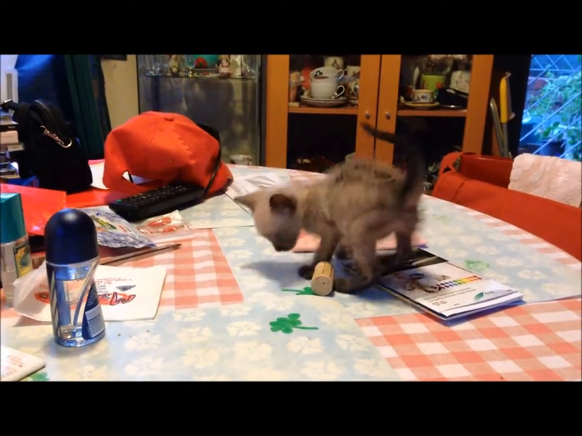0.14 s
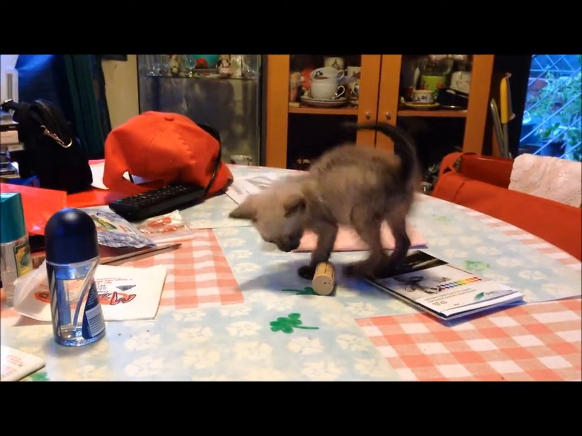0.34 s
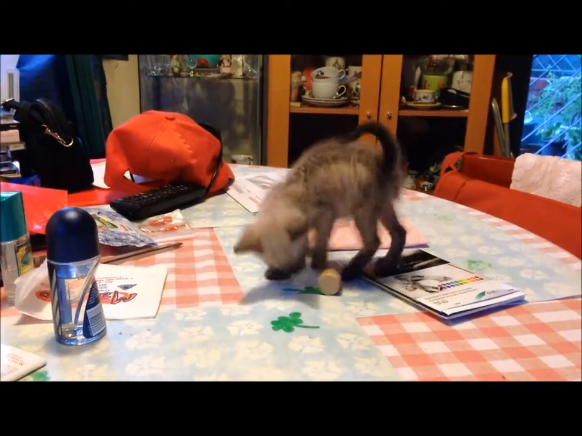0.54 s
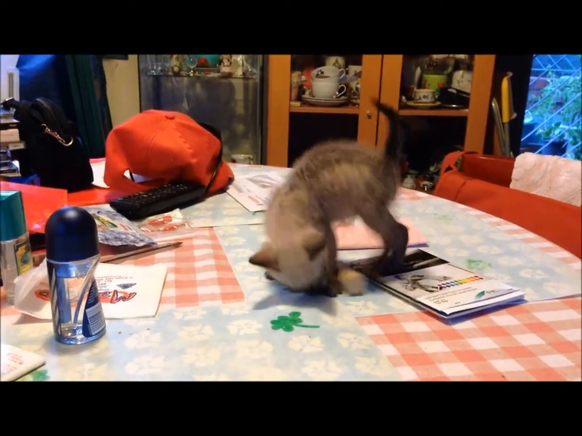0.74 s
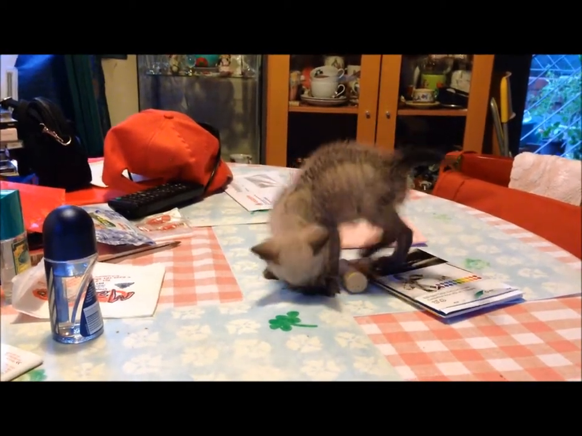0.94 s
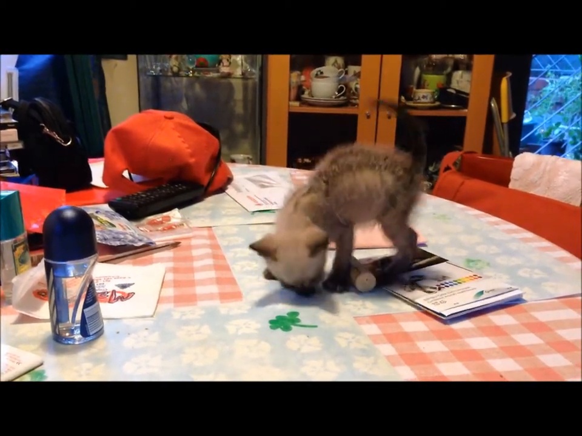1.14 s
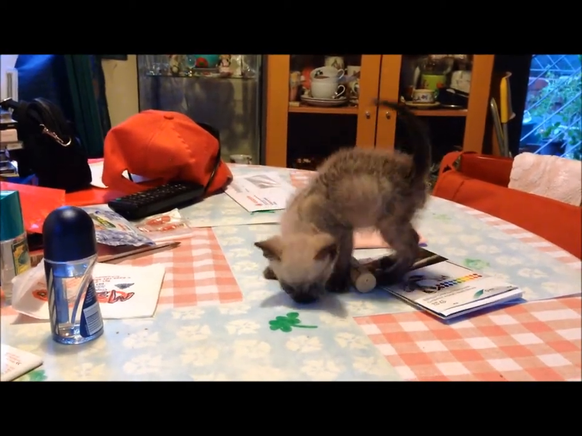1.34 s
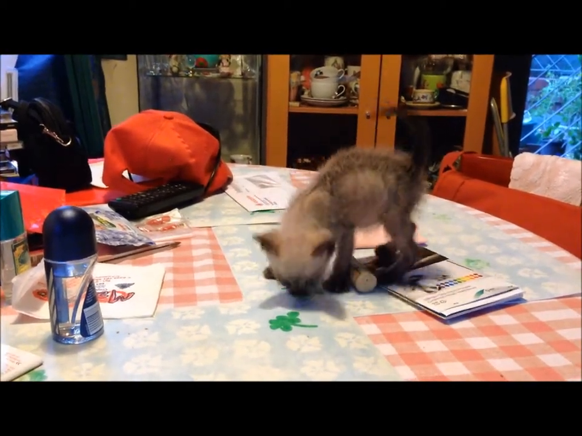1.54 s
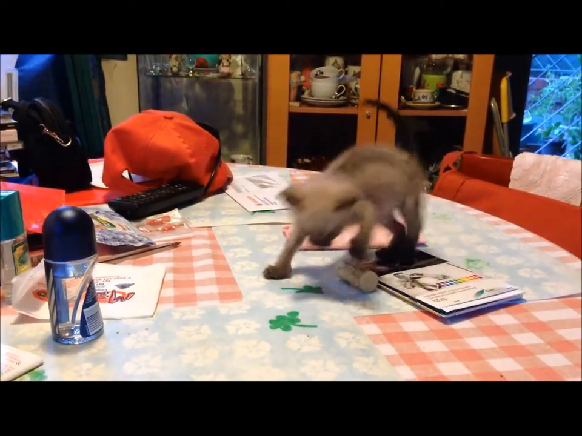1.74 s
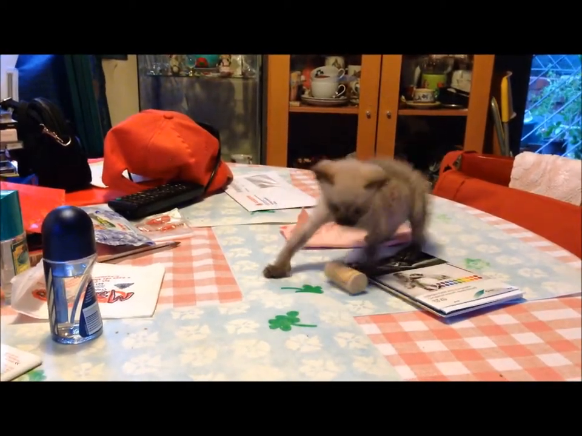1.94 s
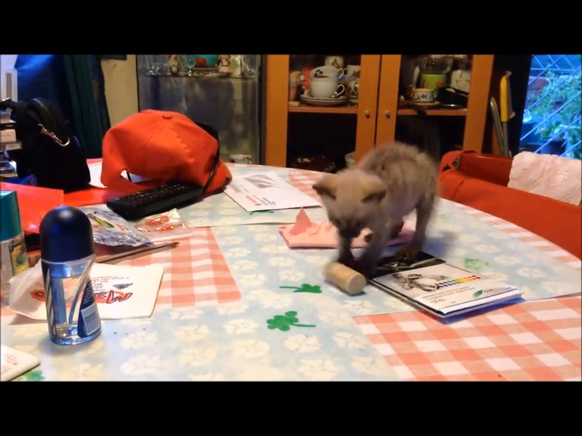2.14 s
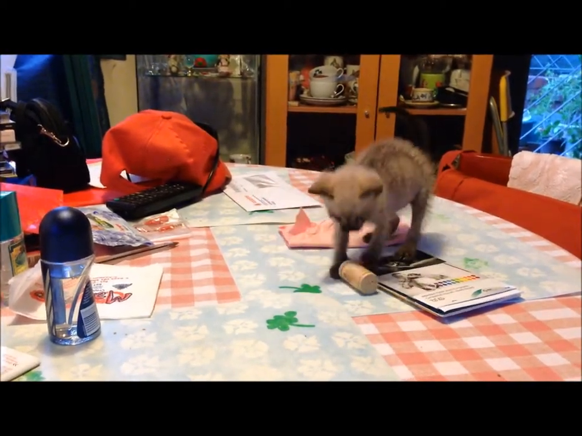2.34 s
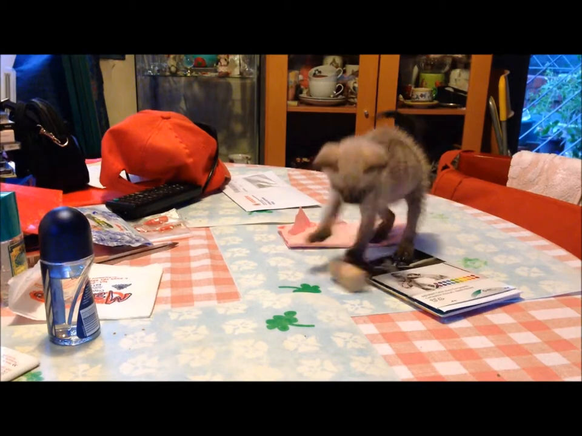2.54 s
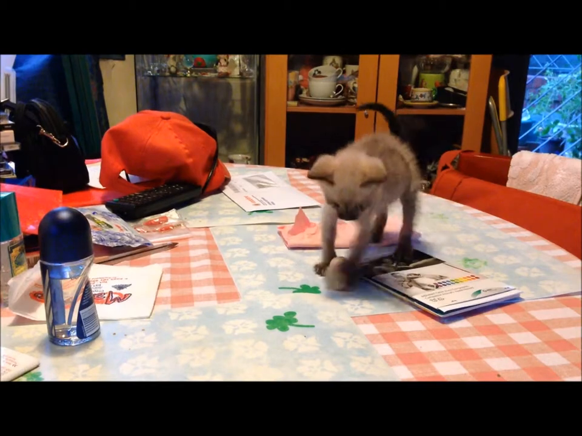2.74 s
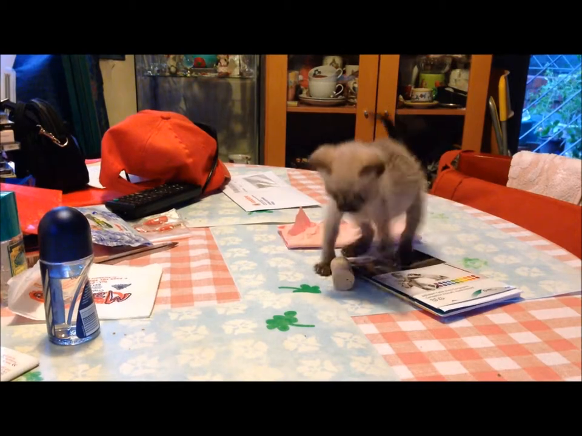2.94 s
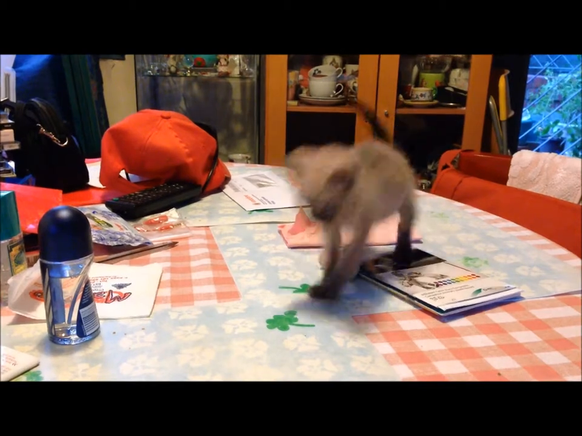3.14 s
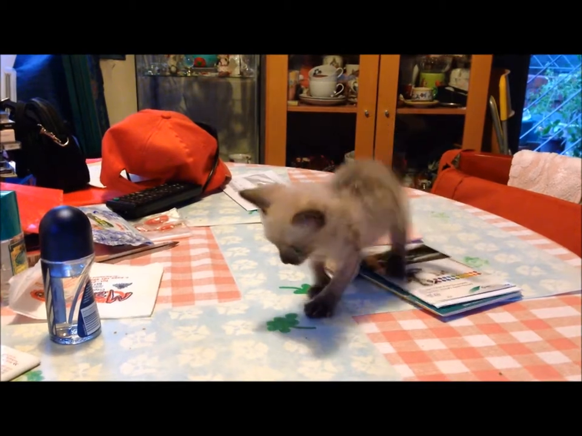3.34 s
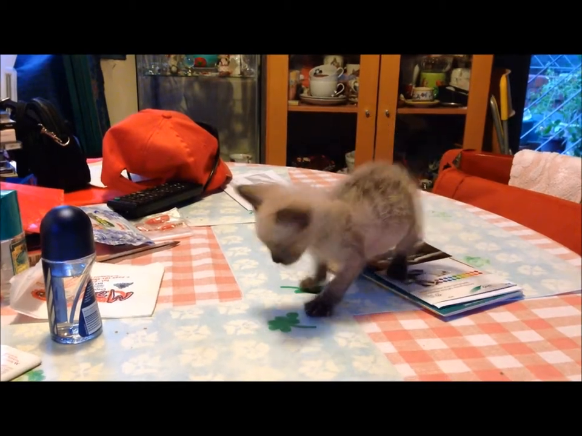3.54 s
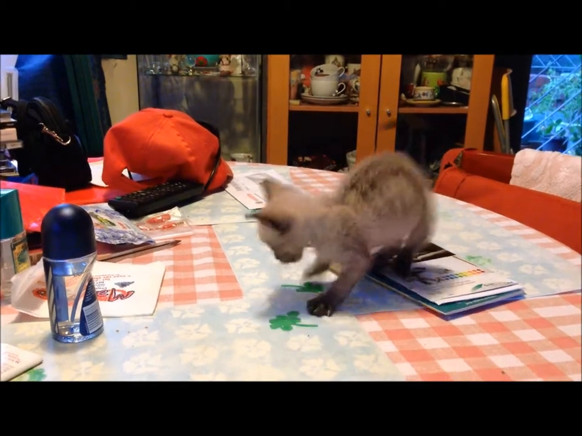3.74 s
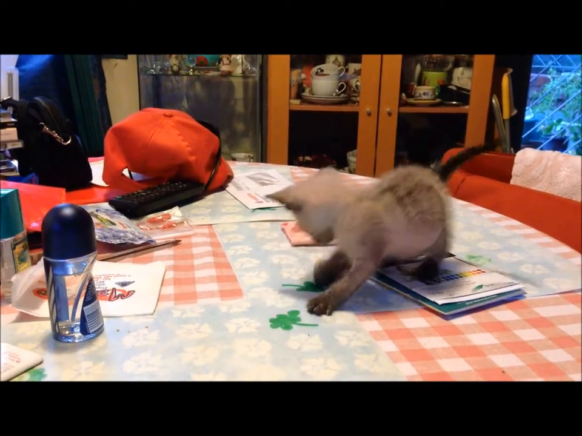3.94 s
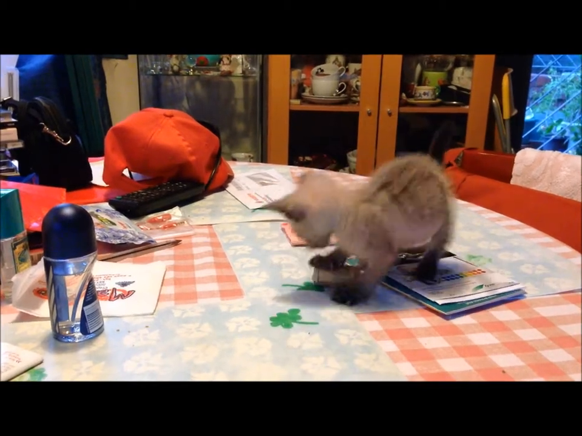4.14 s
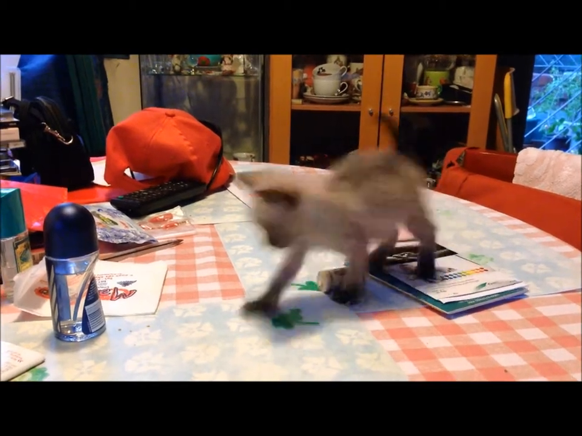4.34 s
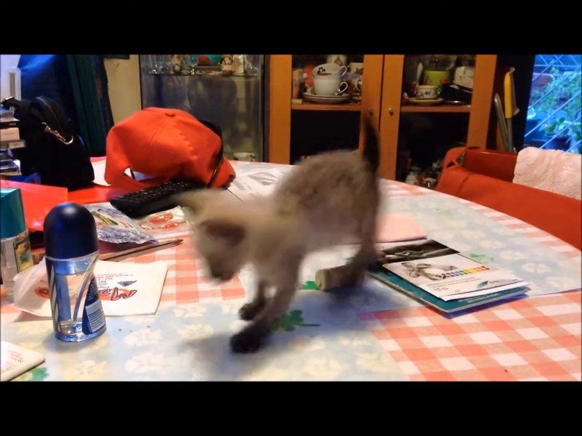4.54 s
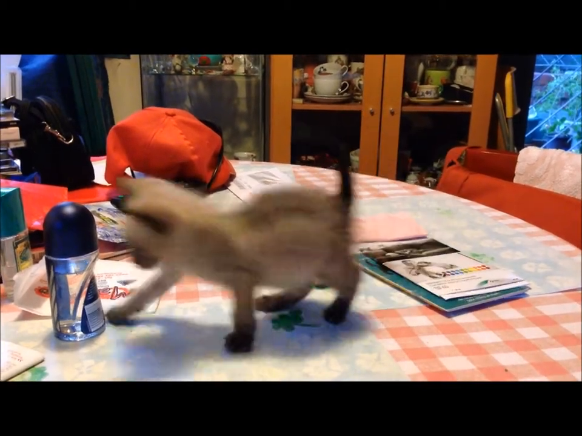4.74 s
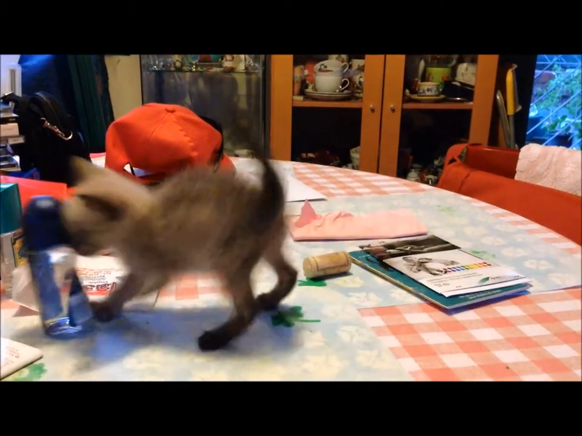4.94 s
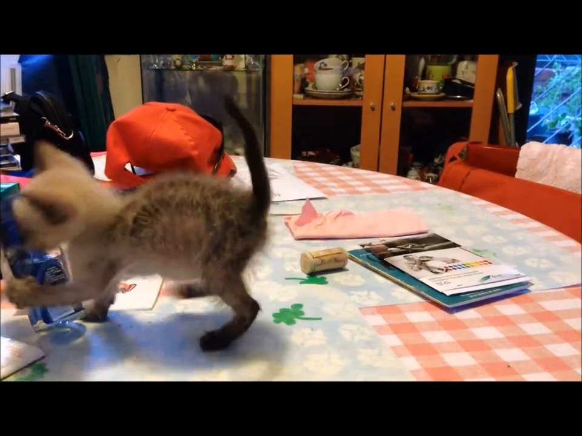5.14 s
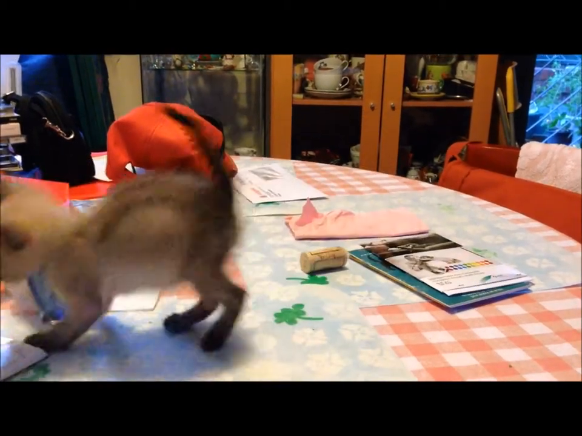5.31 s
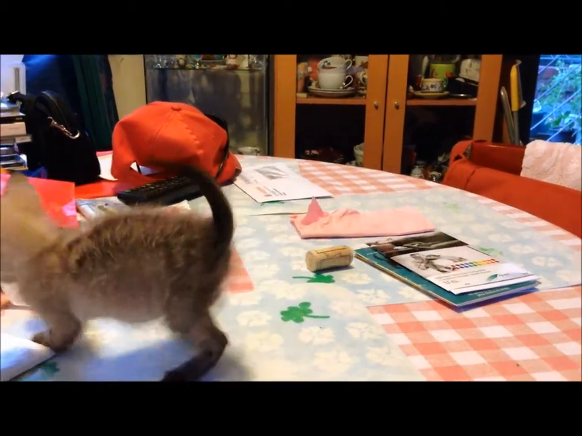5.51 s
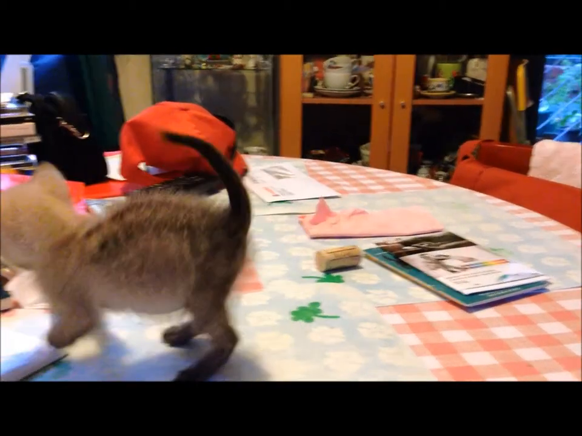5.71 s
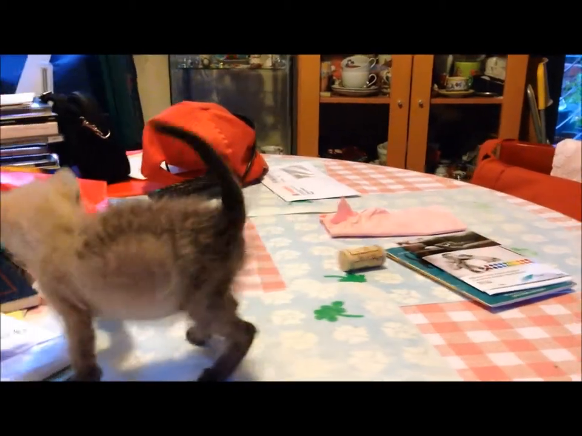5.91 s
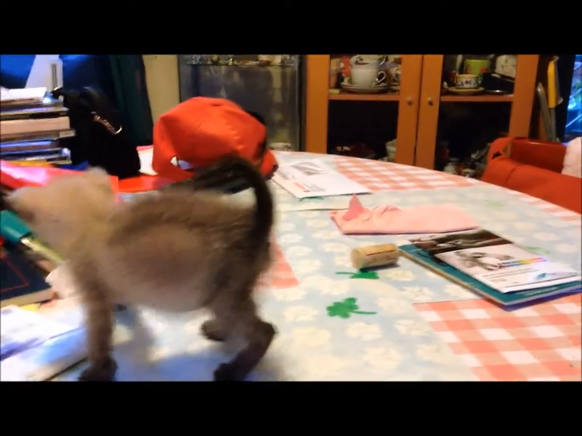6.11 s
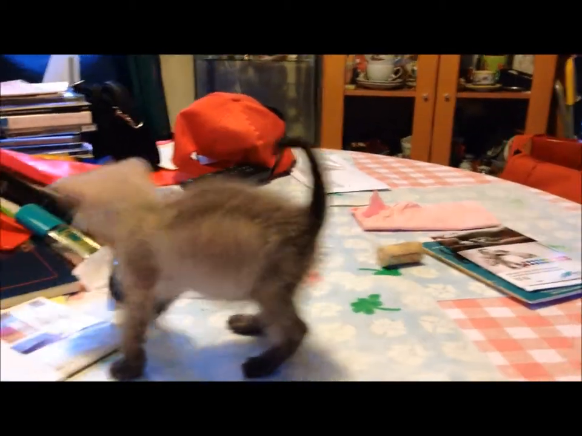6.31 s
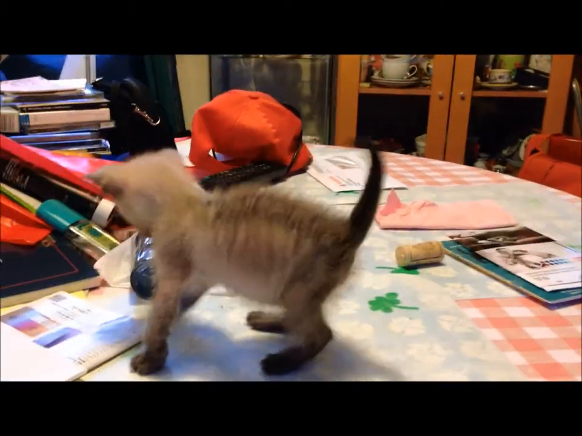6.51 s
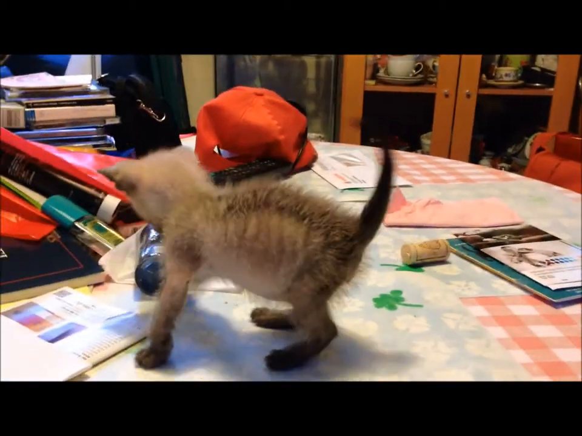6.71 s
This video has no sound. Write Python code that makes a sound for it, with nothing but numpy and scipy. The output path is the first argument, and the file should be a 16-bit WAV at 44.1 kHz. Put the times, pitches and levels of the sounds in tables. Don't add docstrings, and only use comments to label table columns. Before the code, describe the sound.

A small furnished room with short, grainy echoes, faint steady microphone hiss and far low rumble. A kitten plays with a cork on a cloth-covered table. A dry, light tap comes at 0.2 seconds, a faint one at 0.75, then a tight cluster at 1.1 to 1.16 with a soft paw landing. Quiet rocking nudges follow. Clearer taps fall at 2.0, 2.3 and 2.55, a claw click and scuff at 3.06, and a brisk flurry from 3.8 to 4.0 with brushing paws. Muffled little landings and ticks run from 4.4 to 4.95. Around 5.34 comes a tap, at 5.41 a sharp click as a small bottle tips, and at 5.47 its loud, low thump, by far the loudest event, with a weaker bounce at 5.53 and a brief shell rattle. Faint ticks follow at 5.75 to 5.8, a slight airy room swell near 6.1, and light taps with scuffs at 6.4 and 6.57.

```python
import sys
import numpy as np
from scipy import signal
from scipy.fft import rfft, irfft, next_fast_len
from scipy.io import wavfile
from scipy.ndimage import uniform_filter1d

SR = 44100
rng = np.random.default_rng(int(sys.argv[2]) if len(sys.argv) > 2 else 0)


def dump_mix(stems):
    frames = np.atleast_2d(stems).T
    limited = np.clip(frames, -1, 1)
    pcm = np.round(limited * 32767).astype(np.int16)
    wavfile.write(sys.argv[1], SR, pcm)


def amplitude_ratio(level_db):
    exponent = np.asarray(level_db, float) / 20
    return 10 ** exponent


N = 298557


def unit(x):
    return x / np.sqrt(np.mean(x ** 2) + 1e-20)


def along(points, hz):
    f, v = np.transpose(points)
    return np.interp(np.log(hz + 1), np.log(f + 1), v)


def filtered(x, response):
    m = next_fast_len(len(x) + 8192)
    return irfft(rfft(x, m) * response(np.fft.rfftfreq(m, 1 / SR)), m)[:len(x)]


def resonance(centre_hz, width_hz):
    return lambda f: 1j * f * width_hz / (centre_hz ** 2 - f * f + 1j * f * width_hz)


def add(track, s, x):
    part = track[round(s * SR):][:len(x)]
    part += x[:len(part)]


def dying(decay, colour):
    hz, t, z = signal.stft(rng.standard_normal(SR // 2), SR, nperseg=256)
    z = z * amplitude_ratio(along(colour, hz)[:, None] - 60 * t / along(decay, hz)[:, None])
    tail = signal.istft(z, SR, nperseg=256)[1]
    return tail / np.linalg.norm(tail)


def taps():
    # frequency in Hz, t60 in seconds.
    room_decay = [(300, 0.15), (2000, 0.21), (5000, 0.18), (12000, 0.88)]
    # frequency in Hz, level in dB.
    room_colour = [(300, 2.5), (1200, -0.5), (2200, -2.5), (5000, 0), (14000, -18)]
    rise_s = .00036
    dip_hz, dip_width_hz, dip_depth = 2790, 530, 0.62
    out = np.zeros(N)
    t = np.arange(SR // 50) / SR
    for s, db, hz, click_db, crack_db, wet_db in contacts():
        swell = (t / rise_s) ** 1.5 * np.exp(-t / rise_s)
        main = np.sin(2 * np.pi * hz * t)
        partner = .6 * np.sin(2 * np.pi * 1.33 * hz * t + rng.uniform(0, np.pi))
        below = 0.394 * min(amplitude_ratio(click_db), 1) * np.sin(2 * np.pi * 0.754 * hz * t)
        body = swell * (main + partner + below)
        click = amplitude_ratio(click_db) * snap(t, centre_hz=4110, width_hz=2180, life=0.000502)
        crack = amplitude_ratio(crack_db) * snap(t, centre_hz=7550, width_hz=3200, life=.0005)
        tap = amplitude_ratio(db + 5.0) * (body / np.abs(body).max() + click + crack)
        add(out, s - .0004, tap)

        touch = rng.standard_normal(len(t)) * np.exp(-((t - .004) / 0.0045) ** 2)
        brush = filtered(touch, lambda f: resonance(2600, 1200)(f) ** 2)
        add(out, s - .005, amplitude_ratio(db - 5.0) * brush)

        sideways = amplitude_ratio(db - 0.5) * snap(t, centre_hz=2270, width_hz=1600, life=0.00014)
        spread = 0.47 * tap + sideways
        tail = dying(room_decay, room_colour)
        lumps = unit(uniform_filter1d(rng.standard_normal(len(tail)), size=90))
        tail = tail * amplitude_ratio(3.7 * lumps)
        echo = signal.fftconvolve(spread, tail / np.linalg.norm(tail))
        add(out, s + .003, amplitude_ratio(wet_db - 0.5) * echo)

    def radiation(f):
        low_cut = (1j * f / (520 + 1j * f)) ** 3
        return low_cut * (1 - dip_depth * resonance(dip_hz, dip_width_hz)(f))

    return filtered(out, radiation)


def contacts():
    # start in seconds, peak in dB, ring in Hz, hardness in dB.
    knocks = [(0.2048, -27.5, 1830, -32), (0.7491, -43.5, 1850, -4), (1.0915, -40, 1700, -8),
              (1.0989, -36.5, 1240, -11), (1.1589, -27, 1690, -26), (1.7601, -45.5, 1270, -4.5),
              (2.0147, -28.5, 2019, -5), (2.3305, -38.5, 1928, -2.5), (2.5536, -35, 2030, -1.5),
              (2.663, -46.5, 1600, -10), (3.7921, -33, 1270, -13), (3.8154, -38.5, 2100, -13),
              (3.888, -44, 1360, -12), (3.9848, -32.5, 2290, -0.5), (3.9938, -28, 2040, 0.5),
              (4.44, -50, 1560, -9), (4.744, -51, 1250, -3.5), (5.3376, -30, 1610, -9.5),
              (6.378, -34.5, 1950, -5), (6.5692, -35.5, 1546, -7), (6.5726, -41, 1700, -8)]
    # start in seconds, peak in dB, ring in Hz, hardness in dB.
    muffled = [
        (3.0935, -41.5, 1760, -14),
        (4.585, -42, 1860, -9.5),
        (4.6214, -44, 2120, 0),
        (4.794, -35.5, 2300, 3),
    ]
    # start in seconds, peak in dB, ring in Hz, hardness in dB.
    claws = [(0.1775, -57, 2010, 0), (0.4954, -55, 1790, -4), (0.778, -51.5, 1910, -1),
             (0.9924, -66.5, 2780, 6), (1.1371, -30, 2120, -12.5), (1.9182, -55, 1490, -2.5),
             (2.7277, -51.5, 1600, -1.5), (3.0617, -33.5, 1900, -12), (3.5972, -57, 2480, -22),
             (4.139, -59, 1860, 1.5), (4.4113, -45, 2070, -3), (4.9392, -50.5, 2300, -4),
             (4.9876, -50.5, 2700, -4), (5.4124, -21.5, 1690, -2), (5.7454, -52.5, 2600, 0),
             (5.8174, -46.5, 2000, -11), (6.3804, -39.5, 2390, -11.5), (6.566, -37.5, 2140, -8)]
    # start in seconds, peak in dB, ring in Hz, hardness in dB.
    rattles = [
        (5.429, -50, 1930, 1.5),
        (5.4689, -30.5, 2000, -10),
        (5.4924, -37.5, 2160, -1),
        (5.5318, -35, 1740, 7),
        (5.543, -30.5, 2310, -17),
        (5.5494, -42.5, 3370, -2),
    ]
    # start in seconds, peak in dB, ring in Hz.
    nudges = [(0.066, -58, 2070), (1.03, -57, 1857), (1.038, -59, 1600), (1.353, -60, 1940),
              (1.431, -56, 1790), (1.49, -53, 1990), (1.6583, -59, 2140), (2.1654, -65, 2450),
              (2.7, -55, 2360), (2.743, -55.5, 1410), (2.88, -51, 1590), (2.9733, -58.5, 1530),
              (3.2025, -49.5, 1620), (3.243, -51, 1660), (3.378, -57, 2340), (3.4273, -50, 1720),
              (3.447, -50.5, 2480), (3.773, -50, 1470), (4.1842, -48.5, 1740), (4.2777, -60, 2200)]
    # start in seconds, peak in dB, ring in Hz.
    tips = [
        (4.4633, -67, 2500),
        (4.509, -62.5, 2010),
        (4.9514, -59.5, 2330),
    ]
    nudge_hard_db, tip_hard_db = -10.5, 16.5
    wet_per_hard_db, dry_per_peak_db = 0.15, 0.33
    # events, click over hardness in dB, crack over hardness in dB, most crack in dB, room answer in dB.
    kinds = [(knocks, 1.66, -11, -23.5, -5),
             (muffled, 1.3, -30, -34, -5),
             (claws, -0.5, 3.1, 12, -0.5),
             (rattles, .3, -4, -4, -4.5),
             ([r + (nudge_hard_db,) for r in nudges], 5, -24, -12, -6),
             ([r + (tip_hard_db,) for r in tips], 0.9, -9, 2, -14)]
    rows = []
    for events, click, crack, most, wet in kinds:
        for s, db, hz, hard in events:
            crack_db = min(hard + crack, most)
            wet_db = wet + wet_per_hard_db * hard - dry_per_peak_db * (db + 34.5)
            rows.append((s, db, hz, hard + click, crack_db, wet_db))
    return rows


def snap(t, centre_hz, width_hz, life):
    grit = rng.standard_normal(len(t)) * t / life * np.exp(-t / life)
    grit[round(life * SR)] += 2.5
    ring = resonance(centre_hz, width_hz)
    burst = filtered(grit, lambda f: ring(f) ** 2)
    return burst / np.abs(burst).max()


def thumps():
    # start in seconds, peak in dB, hardness in dB per octave.
    landings = [(1.041, -54, -16), (1.091, -44, 22), (1.153, -46, 9), (1.758, -51.5, 9),
                (3.062, -56.5, -13), (3.791, -39.5, 3), (3.885, -47.5, 1), (4.618, -57.5, 10),
                (4.741, -55, -15), (4.941, -46, 1.5), (5.815, -54, 1.5), (6.373, -55, 11.5)]
    # start in seconds, peak in dB, hardness in dB per octave, boom in dB,
    # damping factor.
    fall = [
        (5.413, -30.5, -9, -12, 0.9),
        (5.461, -28.5, -13.5, -26.5, 0.94),
        (5.4686, -5.5, 2.6, -15.5, 1.32),
        (5.5324, -13, 3.2, -8, 1.115),
    ]
    # frequency in Hz, level in dB per Hz.
    boom_colour = [(24, -57), (40, -27), (173, -15.5), (411, -23), (539, -27.5), (746, -31), (1040, -31),
                   (1150, -43.5), (2300, -47.5), (3900, -67.5), (6600, -120)]
    # frequency in Hz, t60 in seconds.
    boom_decay = [(60, .45), (200, 0.31), (450, 0.19), (700, 0.28), (1100, 0.18), (2000, 0.37)]
    paw_boom_db, paw_damping = -8, 1.6
    edge_hz, edge_leak_db = 1060, -26
    ring, boom = np.zeros(N), np.zeros(N)
    blows = [r + (paw_boom_db, paw_damping) for r in landings] + fall
    for s, db, hard_db, boom_db, damping in blows:
        add(ring, s, amplitude_ratio(db + 5.0) * table_ring(hard_db, damping))
        add(boom, s + .004, amplitude_ratio(db + boom_db + 29.5) * dying(boom_decay, boom_colour))
    edge = signal.cheby2(N=8, rs=-edge_leak_db, Wn=edge_hz * 1.1, fs=SR, output="sos")
    both = signal.sosfilt(edge, ring) + boom
    return filtered(both, lambda hz: (1j * hz / (75 + 1j * hz)) ** 3 / (1 + 1j * hz / 2500) ** 2)


def table_ring(hard_db, damping):
    # frequency in Hz, level in dB, t60 in seconds.
    modes = [(94.5, -3, 0.3), (122.5, -1.5, .3), (170, 3.5, 0.19), (205.2, -4, 0.28), (238.3, -4, 0.36),
             (310.4, -4, 0.2), (341, -9, 0.42), (422, -2, 0.18), (475, -10.5, 0.15), (634, -1.5, 0.094),
             (733.5, -8, 0.23), (880, -3.5, 0.089), (950, -7.5, 0.052), (1015, -7.5, 0.1)]
    drain_hz, drain_s, drain_db = 520, .007, 9
    t = np.arange(SR // 2) / SR
    ring = np.zeros(len(t))
    for hz, db, t60 in modes:
        level_db = db + rng.normal(0, 1) + hard_db * np.log2(hz / 300)
        level_db = level_db - (hz > drain_hz) * drain_db * (1 - np.exp(-t / drain_s))
        ring += amplitude_ratio(level_db - 60 * t * damping / t60) * np.sin(2 * np.pi * hz * t)
    ring *= 1 - np.exp(-t / .0006)
    ring *= .55 + .45 * np.exp(-t / .012)
    return ring / np.abs(ring).max()


def scuffs():
    # start in seconds, level in dB, centre in Hz, length in seconds,
    # brightness from 0 to 1.
    strokes = [(0.63, -63.5, 1810, 0.06, 0.8), (1.088, -48.5, 2050, 0.015, 0.75),
               (1.694, -66.5, 1900, 0.043, 0), (1.902, -72, 1730, 0.069, .2),
               (2.223, -61, 1930, 0.041, 0.7), (2.562, -58, 2310, 0.061, 1), (3.051, -53, 4540, 0.064, 0.9),
               (3.78, -47, 5700, 0.025, .5), (3.973, -44, 3020, 0.049, 1), (4.412, -45, 8600, 0.011, 0),
               (4.426, -70, 1760, 0.064, 0.2), (4.786, -54.5, 4070, 0.046, 0.99),
               (5.415, -53, 5100, 0.13, 0.8), (5.416, -56.5, 8540, 0.077, 0),
               (5.518, -52.5, 3366, 0.072, 1), (5.741, -54.5, 5970, 0.011, 0.8),
               (6.358, -53.5, 2530, 0.061, 0.81), (6.566, -51.5, 3560, 0.047, 1)]
    out = np.zeros(N)
    for s, db, hz, length, bright in strokes:
        u = np.arange(SR // 4) / SR / length
        fibres = rng.standard_normal(len(u))
        clumps = unit(uniform_filter1d(rng.standard_normal(len(u)), size=60))
        dull = resonance(hz, 0.68 * hz)

        def cloth(f):
            return dull(f) ** 2 + bright * .5 * f / (f + 1500) / (1 + (f / 9000) ** 2)

        rub = unit(filtered(fibres * amplitude_ratio(2.6 * clumps), cloth))
        add(out, s, amplitude_ratio(db) * rub * 6.7 * u * np.exp(-(2.63 * u) ** 1.075))
    return out


def background():
    # frequency in Hz, level in dB per Hz.
    rumble_colour = [(20, -33.5), (45, 4), (62, 13.5), (80, 8.5), (108, -5.5), (130, -19.5), (170, -35.5),
                     (290, -120)]
    air_colour = [(47, -36.5), (80, -2), (233, 2.5), (300, -11), (390, -31), (660, -120)]
    upper_colour = [(160, -17.5), (270, 1.5), (350, 1), (512, -5), (652, -7), (901, -16), (1100, -33.5),
                    (1430, -38.5), (2420, -120)]
    hiss_colour = [(290, -29), (500, -1.5), (946, -1.5), (1400, -3), (1670, -0.5), (2890, 0.5), (3860, 1.5),
                   (14500, -2), (15300, -3), (16000, -36)]
    # time in seconds, level in dB.
    rumble_drift = [(0, -72), (.6, -73.5), (1.4, -77), (1.8, -74.5), (2.4, -80), (3.8, -79.5), (5.3, -75.5),
                    (6.77, -80)]
    air_db, upper_db, hiss_db = -69, -72.5, -65.5
    settle_s, settle_width_s, settle_db = 3.3, 1.4, -5.5
    swell_s, swell_width_s, swell_db = 6.06, .2, 9.5
    t = np.arange(N) / SR
    rumble = amplitude_ratio(np.interp(t, *np.transpose(rumble_drift)))
    onset = 1 / (1 + np.exp((settle_s - t) / .05))
    thinning = onset * np.exp(-((t - settle_s) / settle_width_s) ** 2)
    air = amplitude_ratio(air_db + settle_db * thinning)
    upper = amplitude_ratio(upper_db + swell_db * np.exp(-((t - swell_s) / swell_width_s) ** 2))
    room = rumble * rush(rumble_colour, patchy_db=.3)
    room = room + air * rush(air_colour, patchy_db=2.5)
    room = room + upper * rush(upper_colour, patchy_db=3.5)
    return room + amplitude_ratio(hiss_db) * rush(hiss_colour, patchy_db=.3)


def rush(spectrum, patchy_db):
    z = signal.stft(rng.standard_normal(N), nperseg=512)[2]
    field = uniform_filter1d(rng.standard_normal(z.shape), size=5, axis=0)
    field = uniform_filter1d(field, size=12, axis=1)
    noise = signal.istft(z * amplitude_ratio(patchy_db * unit(field)), nperseg=512)[1][:N]
    return unit(filtered(noise, lambda hz: amplitude_ratio(along(spectrum, hz))))


def scene():
    return (taps() + scuffs() + thumps() + background())[None]


def roll_off(x):
    return signal.sosfilt(signal.butter(12, 16480, fs=SR, output="sos"), x)


def record(dry):
    top_hz = 15650
    limited = filtered(dry[0], lambda hz: np.where(hz < top_hz, 1, amplitude_ratio(-41.5)))
    return roll_off(limited[None])


dry = scene()
out = record(dry)
dump_mix(out)
```